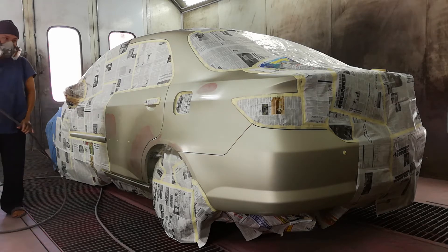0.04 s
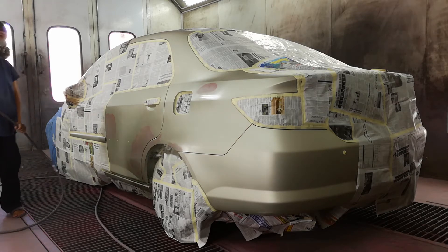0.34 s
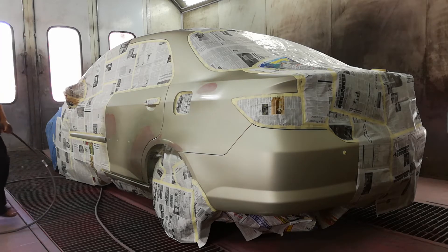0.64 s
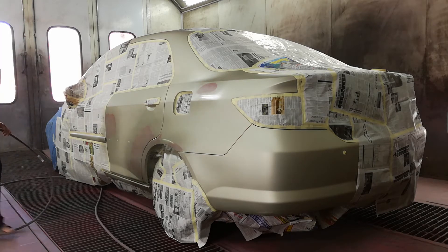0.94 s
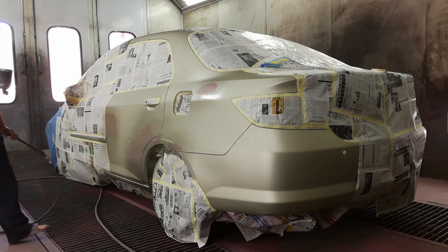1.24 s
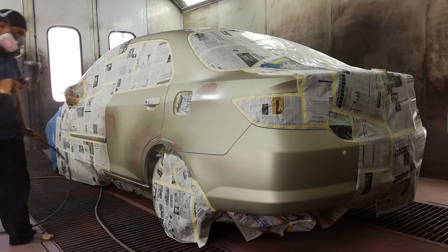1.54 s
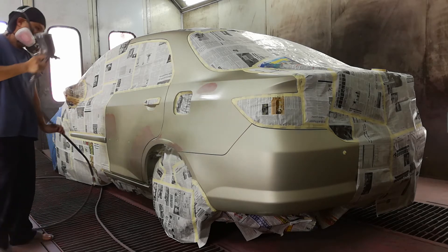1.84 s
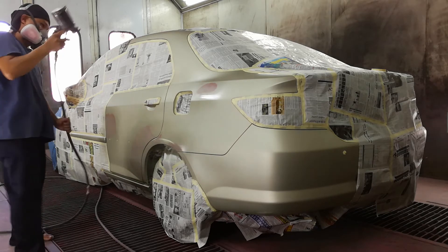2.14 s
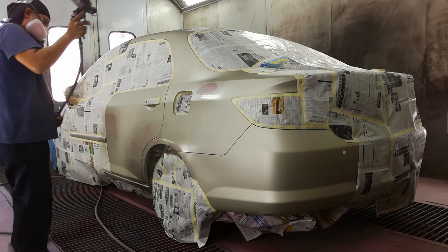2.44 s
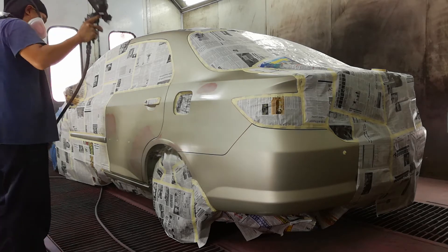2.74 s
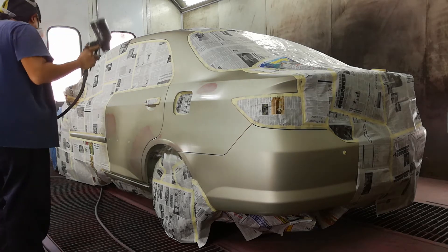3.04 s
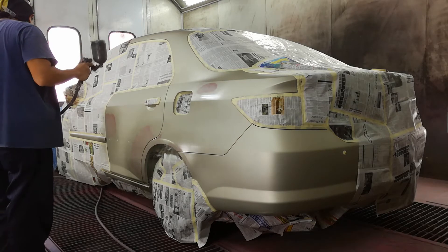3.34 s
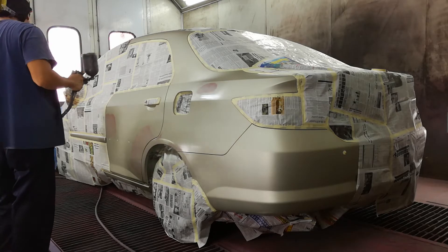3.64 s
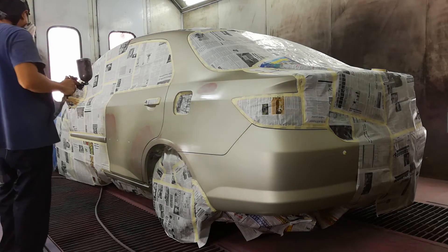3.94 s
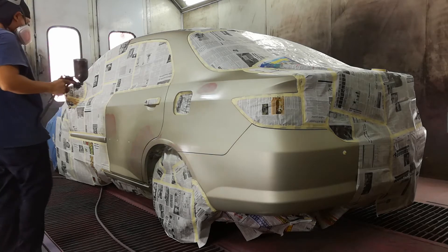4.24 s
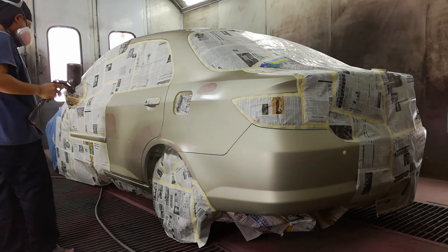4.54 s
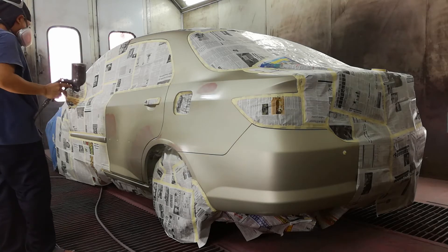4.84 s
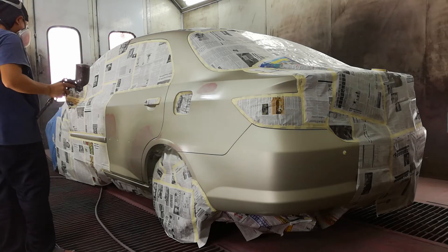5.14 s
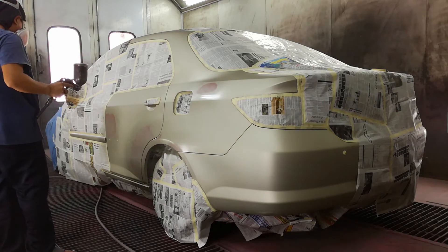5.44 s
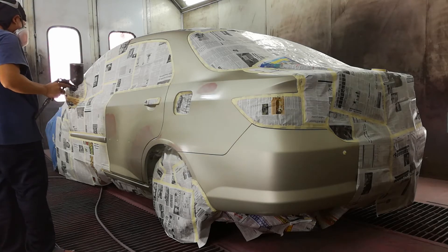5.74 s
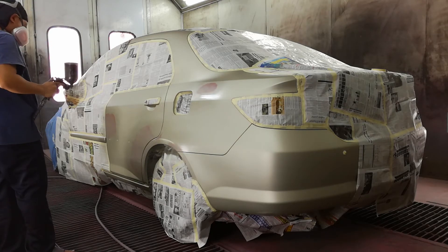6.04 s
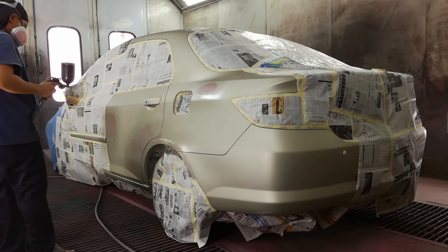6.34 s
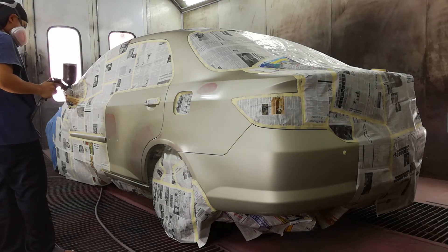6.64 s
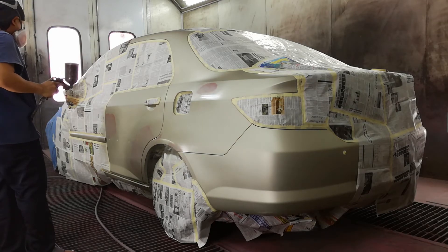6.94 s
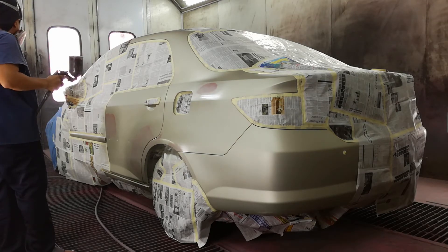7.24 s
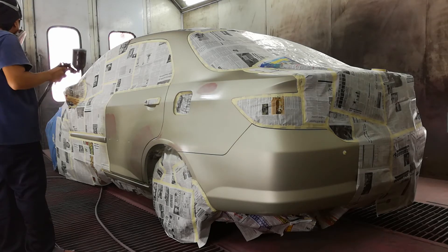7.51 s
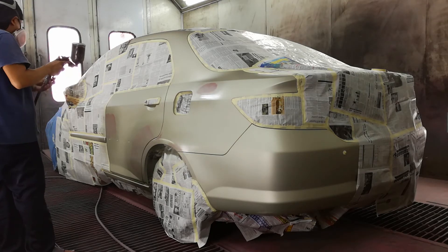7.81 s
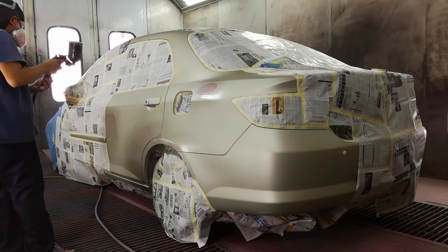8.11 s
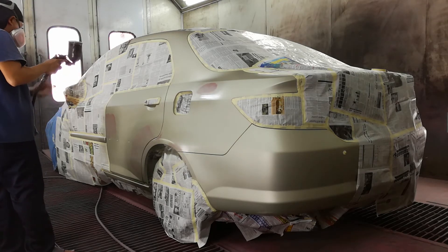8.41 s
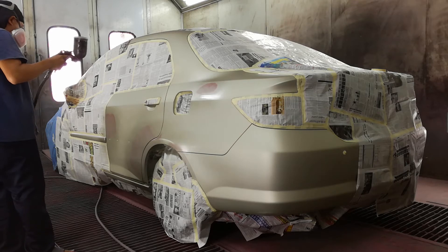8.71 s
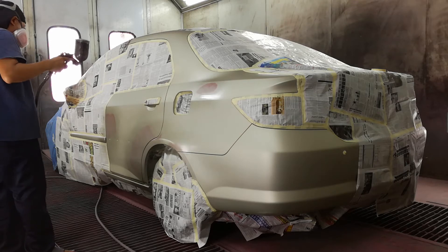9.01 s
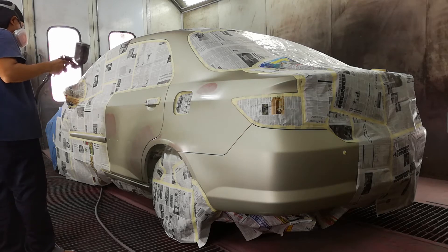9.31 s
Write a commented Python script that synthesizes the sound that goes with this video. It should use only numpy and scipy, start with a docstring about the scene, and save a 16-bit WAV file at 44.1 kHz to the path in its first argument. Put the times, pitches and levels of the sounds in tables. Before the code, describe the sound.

From the start, ventilation fills a closed paint booth: air rushes through ducts and an extractor fan rumbles with a low, pulsing hum and a faint wavering whine. This continues throughout. After a very faint puff, a spray gun opens at about 0.85 seconds with a sharp spit of air, then holds a bright, steady hiss, slightly hollow at first. Between about 1.4 and 3 seconds an edge in the hiss glides down as the gun is raised. Hose, clothes and feet scuff softly from 2 to 2.6 seconds. After 3 seconds the hiss is a little softer, shifting gently in tone as the gun moves along the car. Another low, soft scuff comes near 7.2 seconds. Just after 9 seconds the spray stops, then opens again at about 9.3 seconds. Short reflections from the walls keep everything enclosed.

```python
"""A painter sprays a car in a closed steel booth. From the start, air rushes through the ducts and the
extractor fan rumbles and whines, its blade tone beating against the motor's mains hum. After a faint puff,
the gun opens at 0.85 s with a spit of stored air, and its turbulent jet hisses along the panels. The gun
is raised, and an edge in the hiss glides down. Hose, clothes and feet scuff between 2 and 2.6 s and again
near 7.2 s. Just after 9 s the gun stops for a moment, then opens again."""
import sys
import numpy as np
from scipy import signal
from scipy.fft import rfft, irfft
from scipy.io import wavfile

SR = 44100
rng = np.random.default_rng(int(sys.argv[2]) if len(sys.argv) > 2 else 0)


def pcm_store(signal):
    """Save signal as 16-bit PCM."""
    levels = np.round(np.clip(np.atleast_2d(signal), -1, 1) * 32767)
    wavfile.write(sys.argv[1], SR, levels.astype(np.int16).T)


N = 417627
TIME = np.arange(N) / SR
FREQ = np.maximum(np.arange(N // 2 + 1) * SR / N, 1)

# trigger pulls: (opening [s], closing [s], spit over steady flow [dB], spit decay [s], seep rise [dB/s])
TRIGGER_PULLS = [(0.85, 9.048, 16.5, 0.0073, 175), (9.272, 9.6, 7, 0.02, 270)]


def undb(db):
    """Amplitude ratio of a level in decibels."""
    return 10 ** (np.asarray(db) / 20)


def curve(rows, column=1):
    """Linear interpolation of one table column over time."""
    rows = np.array(rows)
    return np.interp(TIME, rows[:, 0], rows[:, column])


def colour(points):
    """Interpolation of (frequency [Hz], level [dB]) on a logarithmic frequency axis."""
    hz, db = np.transpose(points)
    return np.interp(np.log(FREQ), np.log(hz), db)


def resonance(hz, width_hz):
    """Magnitude response of a resonance with steep skirts."""
    return 1 / (1 + ((FREQ / hz - hz / FREQ) * hz / width_hz / 1.5) ** 2)


def shape(x, gain):
    """Zero-phase filtering by multiplication of the spectrum."""
    return irfft(rfft(x) * gain, N)


def unit(x):
    """Normalisation to rms 1."""
    return x / np.sqrt(np.mean(x ** 2))


def pan(db):
    """Left and right gains for an interaural level difference."""
    return undb(np.array([[.5], [-.5]]) * db)


def noise():
    """Uncorrelated white noise for the two sides."""
    return rng.standard_normal((2, N))


def walk(rate_hz):
    """Random fluctuation of rms 1: noise low-passed near rate_hz."""
    hz = np.arange(N // 2 + 1) * SR / N
    return unit(shape(rng.standard_normal(N), np.exp(-(hz / rate_hz) ** 2)))


def gate(start, rise_s, stop, fall_s):
    """Envelope of smooth attack, hold and release."""
    return (1 + np.tanh((TIME - start) / rise_s)) * (1 - np.tanh((TIME - stop) / fall_s)) / 4


def swell(at, length_s):
    """Gaussian envelope, down to 1/e at length_s from its peak."""
    return np.exp(-((TIME - at) / length_s) ** 2)


def faded(db, dips):
    """Amplitude modulation of a steady level by slow dips."""
    return undb(db - sum(depth_db * swell(at, length_s) for at, length_s, depth_db in dips))


def booth(spectrum, envelope, t60_s, direct_share=0.19, bounce=0.91, drift_s=.00009):
    """Noise in an enclosure: direct sound, early reflections and a diffuse field that stores energy."""
    source = unit(shape(rng.standard_normal(N), spectrum)) * envelope
    early = np.array([source, np.pad(source, (29, 0))[:N]])  # the left side hears it first
    for side in (0, 1) * 3:
        # each path off the car or a wall slowly changes length, so its comb wanders
        lag_s = rng.uniform(.001, .008) + drift_s * np.interp(TIME, np.arange(11), rng.standard_normal(11))
        early[side] += bounce * source[np.clip(np.arange(N) - (lag_s * SR).astype(int), 0, N - 1)]
    early /= np.sqrt(1 + 3 * bounce ** 2)
    # moving air and a moving source scramble the late echoes into noise
    retained = np.exp(-np.log(1e6) / (t60_s * SR))
    energy = signal.lfilter([1 - retained], [1, -retained], envelope ** 2)
    diffuse = unit(shape(noise(), spectrum)) * np.sqrt(energy)
    return np.sqrt(direct_share) * early + np.sqrt(1 - direct_share) * diffuse


def ducts(level_db=-35.5, spacing_m=.24):
    """Duct turbulence as a diffuse field: only long waves are coherent between the two sides."""
    # air rushing through ducts and filters: (frequency [Hz], relative spectral density [dB])
    spectrum = [(25, -15), (55, -20.5), (85, -3.5), (115, -8.5), (180, -7.5), (270, -20.5), (720, -23.5),
                (850, -19), (1100, -20), (1400, -27), (2000, -31), (3800, -41.5), (6300, -46.5),
                (7300, -69), (15500, -60)]
    # its balance between the ears: (frequency [Hz], left minus right [dB])
    balance = [(200, 3), (520, 0), (640, -1), (820, 5), (1000, -1.5), (1200, 4.5), (2000, 1.5), (5000, 0)]
    mid, side = noise()
    coherence = .995 * np.sinc(2 * FREQ * spacing_m / 343)
    air = shape(mid, np.sqrt(1 + coherence)) + np.array([[1], [-1]]) * shape(side, np.sqrt(1 - coherence))
    air = unit(shape(air, undb(colour(spectrum)) * pan(colour(balance))))
    return air * undb(level_db + 0.41 * walk(4.3))


def whine():
    """Narrow resonances excited by noise give a wavering whine."""
    # duct and fan drive resonances: (frequency [Hz], width [Hz], level [dB], left minus right [dB])
    modes = [(304, 11, -58, 3.5), (388.4, 21, -52, -0.5), (464, 16, -60.5, 3), (518.5, 10, -55.5, 6),
             (632, 66, -66, 2), (1656, 130, -57, 2), (2216, 35, -66, 0), (2283, 38, -62, 10.5),
             (2336, 31, -72.5, -12), (6120, 390, -67.5, -5)]
    gain = sum(unit(resonance(hz, width)) * undb(db) * pan(pan_db) for hz, width, db, pan_db in modes)
    return shape(noise(), gain) * undb(2.24 * walk(11.4))


def fan(shaft_hz=16.433, blade_count=6, hum_hz=99.99, blade_db=-30, hum_db=-43, drone_db=-39.5):
    """Rotation gives shaft harmonics; the blade-passing tone beats against the nearby mains hum."""
    # thrum of the unbalanced fan: (harmonic number, level [dB])
    harmonics = [(1, -49.5), (2, -60.5), (3, -53.5), (4, -46), (5, -46), (7, -46), (8, -45), (9, -47.5),
                 (11, -45), (12, -51.5), (14, -54.5), (26, -57.5)]
    # dip of the blade tone: (time [s], half length [s], depth [dB])
    blade_dips = [(2.907, 1.9, 9.5)]
    # dips of the drone, the tenth harmonic: (time [s], half length [s], depth [dB])
    drone_dips = [(.25, 0.47, 9.8), (5.0, 0.92, 14)]
    clock = TIME - .13  # the first crest of the beat falls near 0.13 s
    turns = shaft_hz * clock + .004 * walk(1.2)
    thrum = 0
    for order, db in harmonics:
        thrum = thrum + undb(db + 2 * walk(5.7)) * np.sin(2 * np.pi * (order * turns + rng.random()))
    drone = faded(drone_db, drone_dips) * np.sin(2 * np.pi * (10 * turns + rng.random()))
    blades = faded(blade_db, blade_dips) * np.sin(2 * np.pi * blade_count * turns)
    hum = undb(hum_db) * np.sin(2 * np.pi * hum_hz * clock)
    return np.sqrt(2) * (thrum + drone + blades + hum)


def scuffs():
    """Friction noise: soft, grainy rubs as the painter steps and drags the hose over the floor grating."""
    # hose, clothes and feet: (time [s], half length [s], centre [Hz], width [Hz], level [dB])
    rubs = [(1.995, 0.025, 1100, 1400, -37.5), (2.017, 0.066, 850, 600, -44),
            (2.115, 0.13, 272, 236, -36.5), (2.282, 0.18, 110, 90, -35.5), (2.548, 0.12, 1700, 900, -47.5),
            (7.18, 0.21, 90, 55, -34)]
    out = 0
    for at, length_s, hz, width_hz, db in rubs:
        rub = undb(db + 1.7 * walk(70)) * swell(at, length_s)
        out = out + booth(resonance(hz, width_hz), rub, t60_s=0.22, direct_share=0.79, bounce=0.28)
    bass = shape(out, 1 / (1 + (FREQ / 330) ** 4))
    return out - bass + bass[0]  # long waves reach both sides alike


def valve(open_s=0.0088, close_s=0.0099, slit_s=.009, leak_db=-76, seep_db=-45, dribble_db=-63):
    """Envelopes of throttled flow: air seeps, stored pressure spits, the flow holds, then dribbles away."""
    flow, spit, half_open = 0, 0, 0
    seep = undb(leak_db) + undb(-67) * swell(.43, 0.071)  # steady leak and one faint puff
    for start, stop, spit_db, decay_s, rise_db_per_s in TRIGGER_PULLS:
        held = gate(start, open_s, stop, close_s)
        flow = flow + held
        spit = spit + held * undb(spit_db) * np.exp(-np.maximum(TIME - start, 0) / decay_s)
        seep = seep + (TIME < start) * undb(seep_db - rise_db_per_s * np.abs(start - TIME))
        seep = seep + (TIME > stop) * undb(dribble_db - 60 * np.abs(TIME - stop))
        half_open = half_open + swell(start, slit_s) * undb(6) + swell(stop - .014, slit_s)
    return flow, spit, seep, half_open


def edge(flow, level_db=-42.5, raised_s=1.35, end_hz=5600, fall_oct=1.1, fall_s=.33):
    """Directivity: a band of the jet stands out while the gun is raised and falls as the nozzle turns."""
    raised = gate(raised_s, rise_s=0.33, stop=2.93, fall_s=0.074)
    air = booth(np.ones(len(FREQ)), flow * raised * undb(level_db), t60_s=.35)
    glide_oct = fall_oct * np.exp(-np.maximum(TIME - raised_s, 0) / fall_s)
    # the glide is a crossfade through six overlapping bands
    octaves = np.linspace(0, fall_oct, 6)
    weights = np.exp(-((glide_oct - octaves[:, None]) / .22) ** 2)
    weights = weights / weights.sum(axis=0)
    bands = (shape(air, unit(resonance(end_hz * ratio, 1750 * ratio))) for ratio in 2 ** octaves)
    return sum(weight * band for weight, band in zip(weights, bands))


def off_panel(x, reflection=.17):
    """Comb filtering: the echo off the panel interferes with the hiss, shifting as the gap changes."""
    lag_s = .0013 + .00007 * walk(1)
    echo = x[:, np.clip(np.arange(N) - (lag_s * SR).astype(int), 0, N - 1)]
    return (x + reflection * echo) / np.hypot(1, reflection)


def spray_gun(trim_db=-1, beam_hz=8200, spit_top_db=4, slit_db=-39, hollow_db=-49, hollow_decay_s=0.41):
    """Turbulent jet noise: its body fills the booth, its short waves are beamed where the gun points."""
    # the jet as the gun is moved and aimed: (time [s], level before trim [dB], top octave offset [dB])
    strokes = [(1.05, -36.5, 0.0), (1.55, -36.5, 3), (1.7, -36.5, 0.5), (2.7, -35.5, -1), (3.15, -39.0, 0),
               (3.55, -39.5, -0.5), (3.8, -39, 0.5), (4.2, -38, -0.5), (4.45, -37.5, 2.5), (4.75, -38, 2.0),
               (5.1, -38.5, 0.0), (6.9, -39, 0.5), (7.4, -40.0, -1), (8.0, -40.0, -0.5), (8.2, -38.5, 0.5),
               (8.9, -37.5, -0.5)]
    # hiss of the air cap: (frequency [Hz], relative spectral density [dB])
    spectrum = [(500, -10), (1500, -6.5), (2450, -3), (3000, 0), (4200, -1.3), (4850, 1.5), (5600, -1),
                (6700, 0.5), (7700, -3), (8500, -2.5), (10500, -3.5), (12600, -5), (15400, -3)]
    # colouring by reflections off the car and walls: (frequency [Hz], left minus right [dB])
    balance = [(1600, -3), (3100, 1), (3650, -5.5), (4750, 1), (5500, -3.5), (6600, -0.5), (7200, -4.5),
               (8400, 0.5), (11000, 0), (13000, -2), (15500, -3)]
    flow, spit, seep, half_open = valve()
    hiss = undb(colour(spectrum))
    beamed = 1 / (1 + (beam_hz / FREQ) ** 8)
    jet = undb(curve(strokes) + trim_db + 0.66 * walk(60))  # uneven break-up of the paint flutters
    body_level = jet * (flow + spit) + seep
    top_level = jet * undb(curve(strokes, column=2)) * (flow + spit * undb(spit_top_db)) + seep
    body = booth(hiss * np.sqrt(1 - beamed), body_level, t60_s=0.39, direct_share=0.39, bounce=0.97)
    top = booth(hiss * np.sqrt(beamed), top_level, t60_s=0.24, direct_share=0.3, bounce=1.0)
    # the half-open valve is a narrow slit that sizzles very high
    slit = booth(resonance(13600, 2600), half_open * undb(slit_db), t60_s=.2, direct_share=.5)
    # the hiss rings hollow for a moment after the first pull
    since_pull = np.maximum(TIME - TRIGGER_PULLS[0][0], 0)
    hollow_level = flow * undb(hollow_db) * np.exp(-since_pull / hollow_decay_s)
    hollow = booth(resonance(2700, 450), hollow_level, t60_s=.3)
    return shape(off_panel(body + top + edge(flow) + slit + hollow), pan(colour(balance)))


def scene():
    """Superposition of ventilation, gun and painter."""
    return fan() + ducts() + whine() + spray_gun() + scuffs()


def record(dry, cutoff_hz=15800):
    """Band limiting: an elliptic low-pass cuts the highest treble steeply."""
    return signal.sosfilt(signal.ellip(12, .1, 80, cutoff_hz, fs=SR, output="sos"), dry)


dry = scene()
out = record(dry)
pcm_store(out)
```